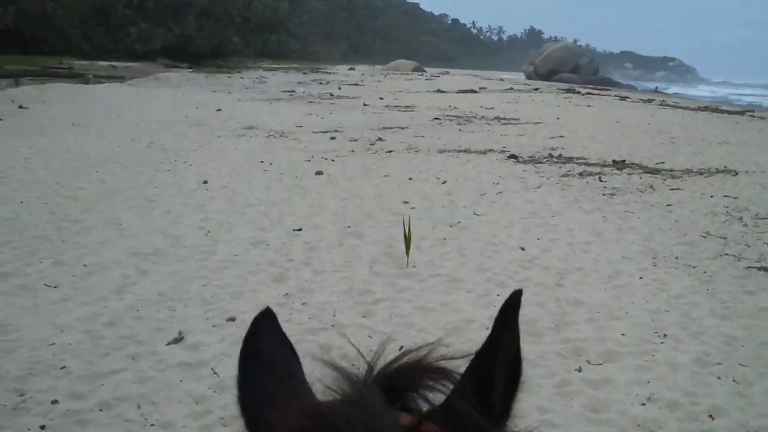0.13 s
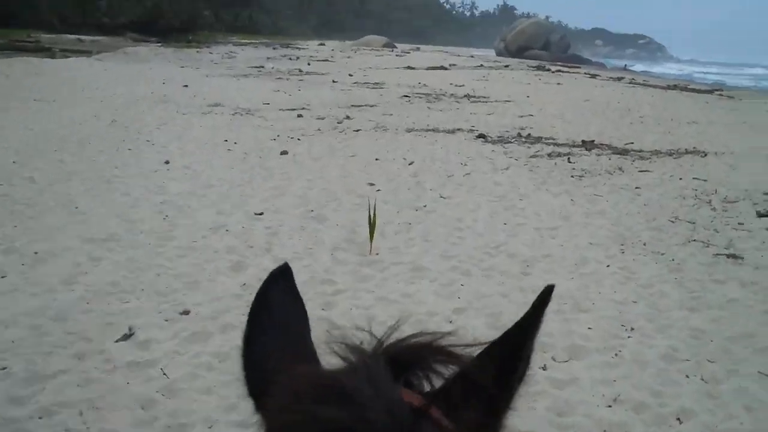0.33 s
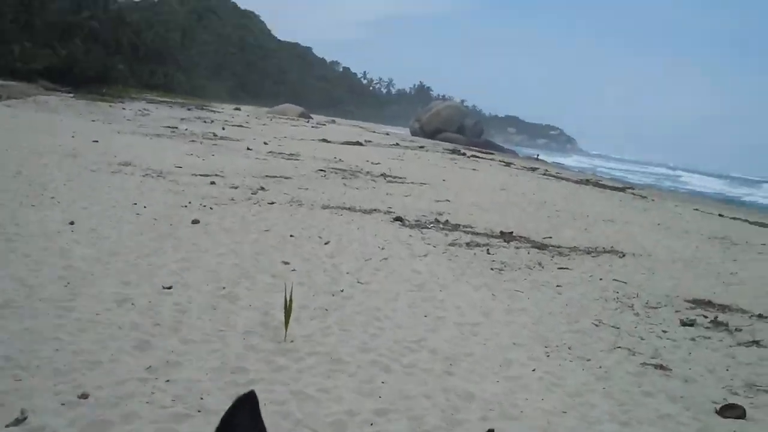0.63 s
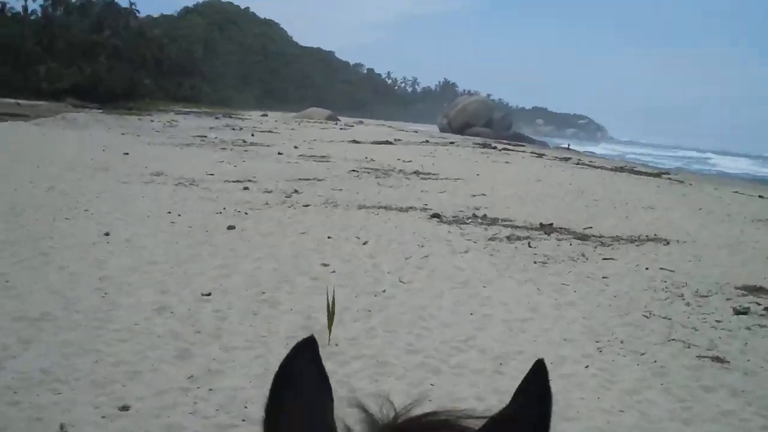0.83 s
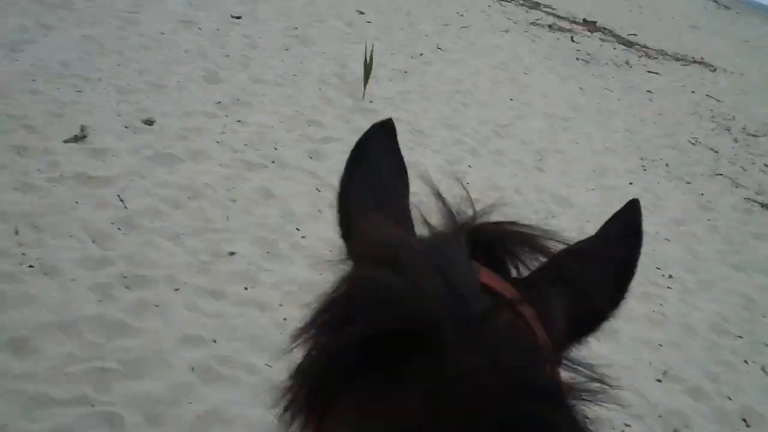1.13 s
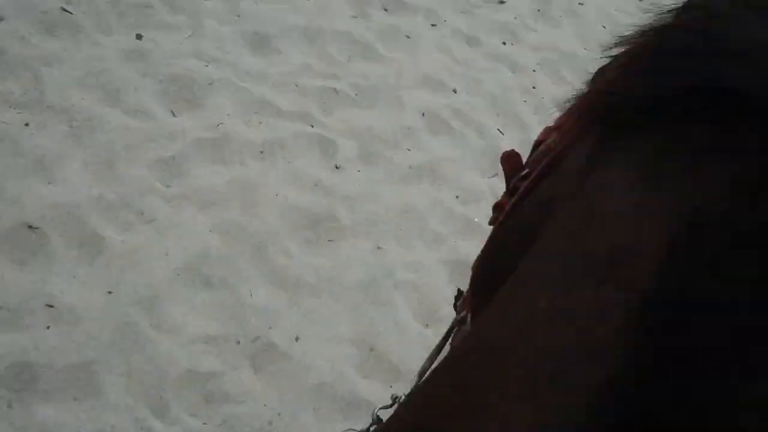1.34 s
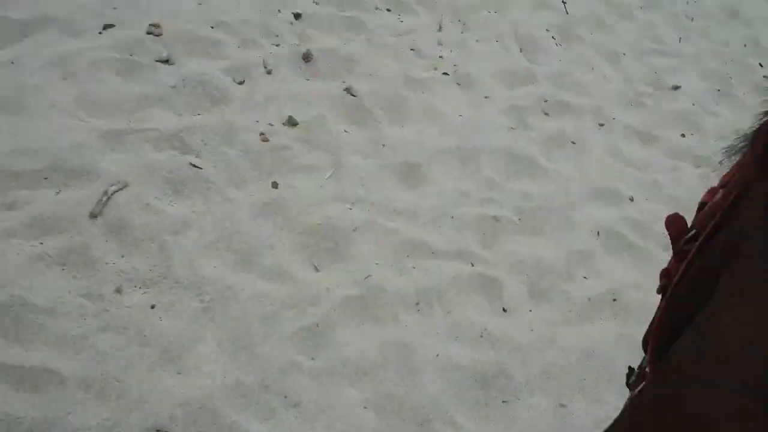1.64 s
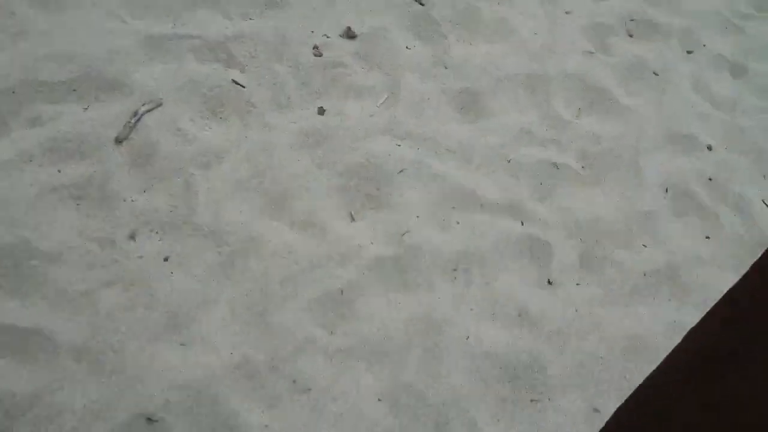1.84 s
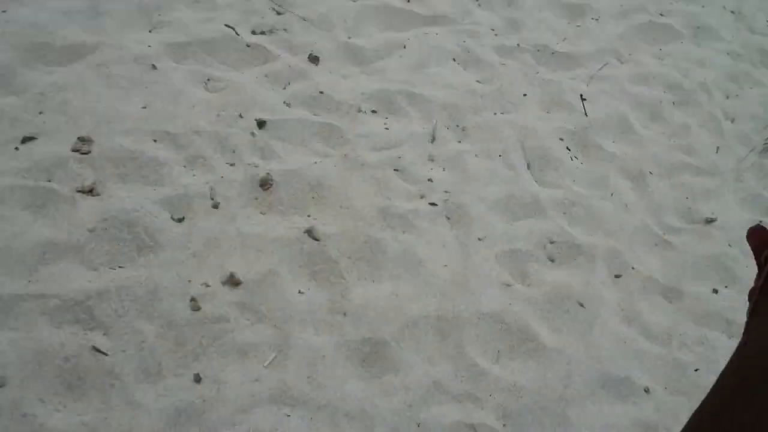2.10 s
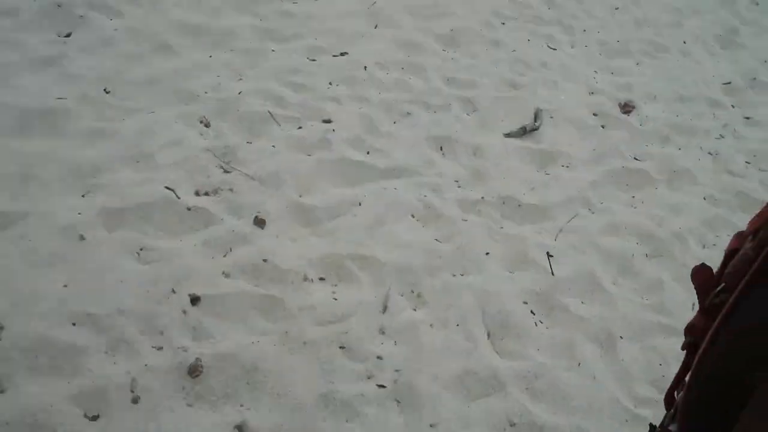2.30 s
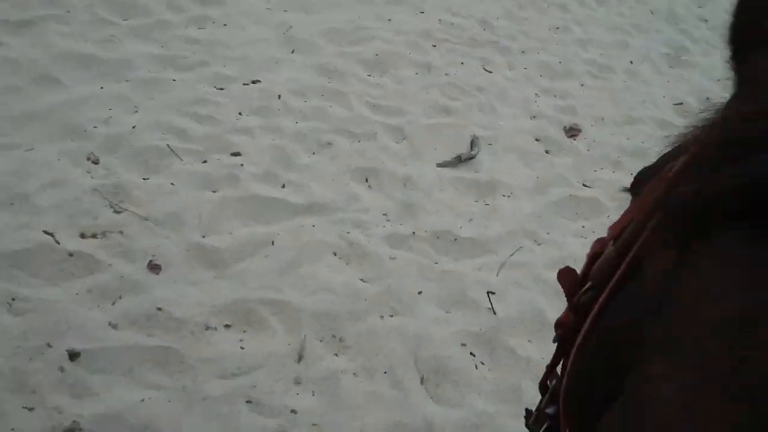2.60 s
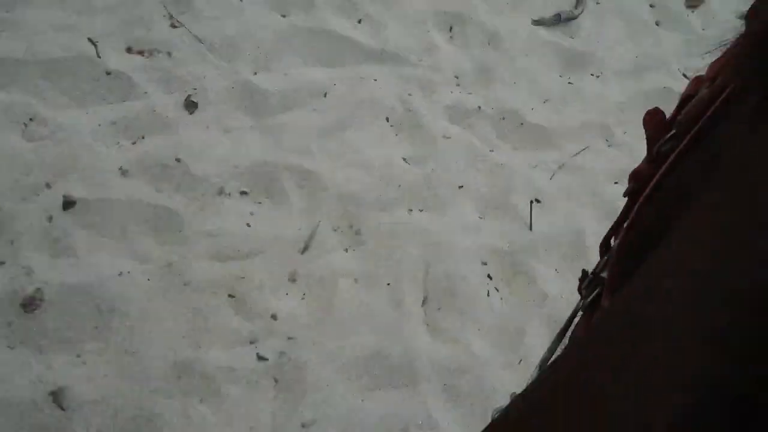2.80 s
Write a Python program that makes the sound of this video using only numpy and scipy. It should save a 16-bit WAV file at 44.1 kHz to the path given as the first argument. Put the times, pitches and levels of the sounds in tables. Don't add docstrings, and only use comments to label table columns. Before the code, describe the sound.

Muffled hoof steps in loose beach sand, saddle knocks and buckle ticks, low wind rumble and far surf

```python
import sys
import numpy as np
from scipy import signal
from scipy.io import wavfile

SR = 44100
rng = np.random.default_rng(int(sys.argv[2]) if len(sys.argv) > 2 else 0)


def boost_factor(decibels):
    exponent = np.asarray(decibels, float) / 20
    return 10 ** exponent


def pcm_store(signal):
    levels = np.round(np.clip(np.atleast_2d(signal), -1, 1) * 32767)
    wavfile.write(sys.argv[1], SR, levels.astype(np.int16).T)


N = 130095


def rms_one(x):
    return x / np.sqrt(np.mean(x ** 2) + 1e-20)


def in_time(rows):
    s, value = np.transpose(rows)
    return np.interp(np.arange(N) / SR, s, value)


def drift(rate_hz):
    hop = 40
    r = np.exp(-2 * np.pi * rate_hz * hop / SR)
    noise = rng.standard_normal(N // hop + 2002)
    slow = signal.lfilter([1], [1, -2 * r, r * r], noise)[2000:]
    return np.interp(np.arange(N) / hop, np.arange(len(slow)), rms_one(slow))


def ring(clicks, hz, t60):
    r = boost_factor(-60 / (t60 * SR))
    w = 2 * np.pi * hz / SR
    return signal.lfilter([0, np.sin(w)], [1, -2 * r * np.cos(w), r * r], clicks + 1e-18)


def bands(source, low_hz, count, per_octave=2):
    edges = low_hz * 2 ** (np.arange(count + 1) / per_octave)
    for k, (low, high) in enumerate(zip(edges, edges[1:])):
        sos = signal.butter(2, [low, high], "band", fs=SR, output="sos")
        yield np.sqrt(low * high), signal.sosfilt(sos, source[k % 2])[-N:]


def coloured(spectrum, low_hz, count, patchy_db, rate_hz):
    hz_axis, db_axis = np.transpose(spectrum)
    together = drift(0.97)
    white = rng.standard_normal((2, N + SR))
    out = np.zeros(N)
    for hz, part in bands(white, low_hz, count):
        level = np.interp(np.log(hz), np.log(hz_axis), db_axis)
        flicker = patchy_db * (0.98 * together + drift(rate_hz))
        out += boost_factor(level + flicker) * part
    return rms_one(out)


def taps(table, crack_db):
    crack_s, contact_s = 0.0018, 0.0004
    out, span = np.zeros(N + SR), int(0.04 * SR)
    t = np.arange(span) / SR
    for s, db, hz, cycles in table:
        sos = signal.butter(3, [0.17 * hz, min(1.68 * hz, 15000)], "band", fs=SR, output="sos")
        crack = signal.sosfilt(sos, rng.standard_normal(span) * np.exp(-t / crack_s))
        tone = signal.sosfilt(sos, ring(t == 0, hz, cycles / hz))
        tap = tone + boost_factor(crack_db) * crack / np.abs(crack).max()
        tap = tap * (1 - np.exp(-t / contact_s))
        start = int(s * SR)
        out[start:start + span] -= boost_factor(db) * tap / np.abs(tap).max()
    return out[:N]


def surf():
    # f/Hz, level per Hz/dB
    surf_colour = [(35, -4.5), (60, -5.5), (138, -5), (471, -18.5), (943, -25), (1680, -34), (3450, -36.5),
                   (6150, -46), (15200, -52)]
    # t/s, level/dB
    swell = [(0.0, -34.5), (0.7, -34.5), (2.0, -35), (2.41, -34.5), (2.7, -35), (2.95, -35)]
    roar = coloured(surf_colour, 39.5, count=18, patchy_db=1.29, rate_hz=7.9)
    return boost_factor(in_time(swell) + 3.5) * roar


def wind():
    # t/s, level/dB
    gusts = [(0.0, -31), (0.75, -29), (1.17, -27), (1.29, -26.5), (1.42, -27.5), (1.63, -28.5), (2.28, -22),
             (2.69, -29), (2.81, -22.5), (2.95, -29.5)]
    # f/Hz, level per Hz/dB
    wind_colour = [(4, 14), (8, 5), (14, 7.5), (25, 1.5), (50, -1.5), (100, -20.5)]
    rumble = coloured(wind_colour, 3.334, count=11, patchy_db=0.95, rate_hz=8.2)
    return boost_factor(in_time(gusts) - 0.5) * rumble


def camera():
    # f/Hz, rms level/dB
    whine = [(6858, -77), (7866, -69), (8372, -76), (9119, -77), (14986, -74)]
    t = np.arange(N) / SR
    buzz_hz, width_hz, buzz_db = 7950, 500, -65
    buzz = ring(rng.standard_normal(N), buzz_hz, 1.5 / width_hz)
    out = boost_factor(buzz_db) * rms_one(buzz)
    for hz, db in whine:
        out += np.sqrt(2) * boost_factor(db) * np.sin(2 * np.pi * hz * t)
    return out


def buckle_ticks():
    # t/s, peak level/dB, f/Hz, cycles rung
    ticks = [(.111, -35, 10000, 13), (.134, -34, 8900, 12), (.187, -35, 6500, 11), (.2, -30.5, 9500, 19),
             (.239, -34, 11000, 12), (.273, -29, 11200, 18), (.301, -35, 10500, 12), (.307, -37, 7700, 23),
             (.687, -43, 5460, 20), (.445, -36, 5960, 8), (.572, -33, 10400, 40), (.66, -34, 5630, 20),
             (.673, -28, 4150, 44), (.718, -34, 4220, 15), (.84, -32, 4970, 15), (1.438, -39.5, 10800, 60),
             (1.609, -38, 7800, 41), (1.711, -28.5, 6900, 2.6), (1.776, -36.5, 7900, 7.4),
             (1.905, -35, 3260, 18), (.588, -31.5, 3240, 17), (2.277, -25, 4000, 45),
             (2.8655, -23, 6000, 30), (1.247, -28, 3700, 42), (2.476, -37, 10000, 10),
             (2.498, -39, 10000, 10), (2.562, -38, 9900, 8), (.668, -33, 5550, 26), (2.912, -38, 5500, 10),
             (1.533, -38, 4400, 30), (1.609, -37, 4970, 25), (1.612, -43, 9600, 43),
             (1.7135, -38, 4220, 22), (.567, -36, 10500, 40)]
    return taps(ticks, crack_db=-11)


def snaps():
    # t/s, peak level/dB, centre f/Hz
    dry_snaps = [(.150, -36, 10500), (.171, -36, 12000), (.183, -32, 10500), (.1895, -31, 11000),
                 (.194, -35, 11000), (.2165, -37, 11000), (.214, -39, 4000), (.363, -46, 11000),
                 (.379, -33, 1800), (.379, -37, 9000), (.402, -30, 1390), (.408, -36, 8000),
                 (.445, -33, 11000), (.455, -36, 8000), (.456, -30, 2000), (.466, -38, 4200),
                 (.476, -38, 5000), (.507, -33, 1800), (.537, -31, 1900), (.601, -35, 3000),
                 (.607, -29, 2580), (.636, -31, 2500), (.660, -32, 10000), (.675, -35, 10000),
                 (.686, -35, 8500), (.6945, -41, 9000), (.6945, -29, 3000), (.717, -36, 8000),
                 (1.066, -25.5, 1700), (1.0765, -32.5, 5000), (1.202, -30, 4470), (1.247, -34, 11000),
                 (1.316, -33, 4000), (2.625, -45, 1500), (2.728, -44, 6000), (2.753, -42, 6500),
                 (2.767, -37, 11000), (2.785, -35, 5000), (2.797, -35, 4000), (2.798, -44, 10000),
                 (2.829, -37, 10000), (2.562, -38.5, 5000), (1.325, -31, 1800), (2.866, -31.5, 3500)]
    cycles = 2.5
    return taps([(s, db, hz, cycles) for s, db, hz in dry_snaps], crack_db=0.5)


def sand():
    # t of peak/s, length/s, level/dB, centre f/Hz
    sprays = [(0.18, 0.086, -42.5, 10500), (0.196, 0.19, -46.5, 2280), (0.281, 0.056, -49, 10000),
              (0.452, 0.19, -50.5, 3900), (0.57, 0.3, -46, 7160), (0.69, 0.097, -46, 5900),
              (0.764, 0.11, -54, 4000), (0.867, 0.062, -44, 4000), (0.876, 0.12, -45.5, 8600),
              (.94, 0.12, -43, 8650), (1.06, 0.087, -46, 6960), (1.184, 0.14, -45, 8600),
              (1.259, 0.04, -41, 9000), (1.336, 0.089, -42, 7850), (1.508, 0.063, -47, 3060),
              (1.658, 0.074, -48, 10000), (2.035, 0.046, -48, 9000), (2.29, 0.072, -50, 11000),
              (2.28, 0.13, -42, 2300), (0.44, 0.17, -44.5, 670), (0.868, 0.69, -42.5, 1290),
              (0.644, 0.1, -61, 2800), (1.067, 0.04, -39.5, 500), (1.6, 0.13, -45.5, 890),
              (2.505, .1, -64, 8000), (2.56, 0.057, -49.5, 8000), (2.812, 0.074, -44, 7740)]
    # t of peak/s, length/s, level/dB, centre f/Hz
    jets = [
        (0.6, 0.026, -46, 10500),
        (.682, .03, -53, 10000),
        (.852, 0.044, -39, 3800),
        (.85, .035, -42, 7300),
        (0.878, 0.043, -41, 9000),
        (.898, 0.027, -49, 11000),
        (1.2, 0.021, -49, 12500),
        (1.256, 0.03, -47, 12600),
        (2.297, .09, -46, 2580),
    ]
    spray_octaves, jet_octaves = 0.99, 0.3
    rise_share = 0.6
    grains_per_s, grain_share, grain_spread_db = 1100, 0.55, 3.4

    sizes = boost_factor(grain_spread_db * np.minimum(rng.exponential(1, N), 5)) * rng.choice([-1, 1], N)
    landing = rng.random(N) < grains_per_s * boost_factor(4.0 * drift(40)) / SR
    grains = rms_one(sizes * landing)
    hiss = rng.standard_normal((2, N))
    source = np.sqrt(grain_share) * grains + np.sqrt(1 - grain_share) * hiss

    t = np.arange(N) / SR
    clouds = []
    for table, octaves in ((sprays, spray_octaves), (jets, jet_octaves)):
        for s, length, db, centre in table:
            side = length * np.where(t < s, rise_share, 1 - rise_share)
            shape = 1 / np.cosh(1.75 * (t - s) / side)
            clouds.append((boost_factor(db) * shape / np.sqrt(centre / 12000), centre, octaves))

    out = np.zeros(N)
    for hz, part in bands(source, 424.7, count=21, per_octave=4):
        gain = sum(shape * np.exp(-0.5 * (np.log2(hz / centre) / octaves) ** 2)
                   for shape, centre, octaves in clouds)
        out += gain * boost_factor(1.0 * drift(38)) * part
    return out


def knocks():
    # t/s, peak level/dB, f/Hz, cycles rung
    saddle_knocks = [(.273, -26, 1350, 8.5), (.361, -23.5, 790, 1.7), (.394, -30, 1700, 3),
                     (.407, -34, 1600, 2.6), (.425, -25.5, 1590, 2), (.445, -29, 1510, 2.9),
                     (1.0305, -23, 2180, 9.5), (.595, -27, 1130, 2.5), (.607, -20, 1400, 6),
                     (.6065, -27, 450, 1.5), (1.609, -28, 900, 6), (1.0635, -29, 1300, 6),
                     (.379, -29, 1500, 2.5) , (.659, -25, 1230, 2.7), (1.030, -19.5, 745, 17),
                     (1.064, -22.5, 2000, 18), (1.075, -22, 411, 22), (1.076, -31.5, 1810, 4.1),
                     (1.435, -26.5, 1560, 6), (1.455, -29.5, 2300, 9.7), (1.493, -25.5, 2610, 39),
                     (1.497, -25, 1310, 28), (1.519, -28.5, 1600, 6.4), (1.52, -35, 3230, 17),
                     (1.5, -40, 3400, 20), (1.608, -24.5, 1300, 9), (1.922, -33.5, 2800, 10),
                     (1.493, -27, 3410, 37), (2.724, -29.5, 1400, 11), (2.753, -35.5, 2780, 3.6),
                     (2.797, -28, 1210, 3.2), (2.903, -27.5, 1600, 3.4), (2.948, -29, 1480, 14)]
    return taps(saddle_knocks, crack_db=-6)


def thumps():
    # t/s, peak level/dB, f/Hz
    hoof_pushes = [(.345, -22, 47), (0.968, -20, 58), (1.303, -20, 20.4), (1.951, -16.5, 83),
                   (2.099, -14.5, 35.5), (2.171, -16.5, 21), (2.301, -30, 19), (2.398, -21, 33),
                   (2.511, -20, 44), (2.692, -17.5, 21), (2.77, -40, 15), (2.798, -17, 79),
                   (0.718, -20.5, 86), (0.422, -19, 114)]
    out = np.zeros(N + SR)
    for s, db, hz in hoof_pushes:
        t = np.arange(int(1.5 * SR / hz)) / SR
        push = -np.sin(2 * np.pi * hz * t) * np.sin(np.pi * t / t[-1])
        start = int(s * SR)
        out[start:start + len(t)] += boost_factor(db) * push
    return out[:N]


def metal_rings():
    # t/s, level/dB
    chinks = [
        [(.385, -45), (.401, -41), (.404, -44), (.421, -44), (.435, -41), (.4455, -39), (.453, -47),
         (1.438, -49), (1.548, -49)],
        [(.455, -54), (.476, -46)],
        [(.408, -53), (.424, -54), (.455, -52), (.475, -53)],
    ]
    # f/Hz, time to fall 60 dB/s
    steel_rings = [
        (12550, .022),
        (14700, .04),
        (10900, .02),
    ]
    out = np.zeros(N)
    for (hz, t60), touches in zip(steel_rings, chinks):
        s, db = np.transpose(touches)
        clicks = np.zeros(N)
        clicks[(s * SR).astype(int)] = boost_factor(db)
        out += ring(clicks, hz, t60)
    return out


def strap():
    # t/s, level/dB
    slips = [(1.203, -44), (1.212, -43), (1.219, -45), (1.228, -47), (1.236, -47), (1.254, -46),
             (1.263, -43), (1.274, -47), (1.289, -43), (1.307, -45), (1.315, -45), (1.334, -46),
             (1.344, -45), (1.361, -43)]
    squeak_hz, squeak_t60_s, catch_s = 3800, 0.016, 0.0035
    out = np.zeros(N)
    click = np.arange(SR // 20) == 0
    for s, db in slips:
        for late in (0, catch_s):
            hz = squeak_hz * (1 + 0.03 * rng.standard_normal())
            start = int((s + late) * SR)
            out[start:start + len(click)] += boost_factor(db + 2.5) * ring(click, hz, squeak_t60_s)
    return out


def scene():
    around = surf() + wind() + camera()
    hooves = sand() + thumps()
    tack = buckle_ticks() + snaps() + knocks() + metal_rings() + strap()
    return np.tile(around + hooves + tack, (2, 1))


def top_cut(x):
    return signal.sosfilt(signal.butter(12, 15310, fs=SR, output="sos"), x)


def record(dry):
    offsets = [
        [-.0444],
        [.0409],
    ]
    hiss_db = -72
    mix = dry + boost_factor(hiss_db) * rng.standard_normal(dry.shape)
    mix = signal.sosfilt(signal.cheby2(12, 60, 15950, fs=SR, output="sos"), mix)
    mix = mix + np.array(offsets)
    return top_cut(mix)


dry = scene()
out = record(dry)
pcm_store(out)
```